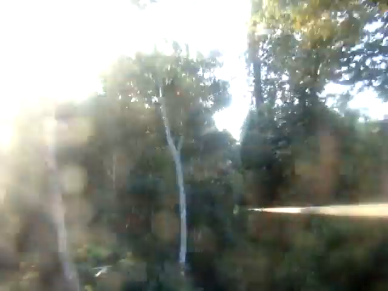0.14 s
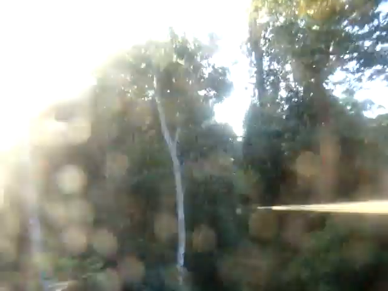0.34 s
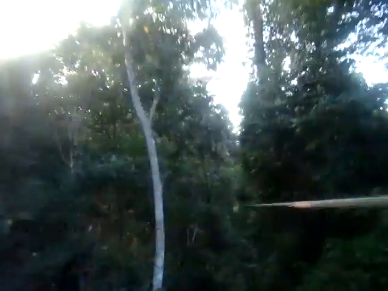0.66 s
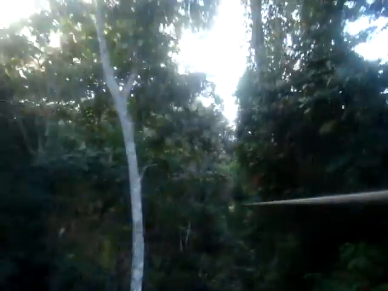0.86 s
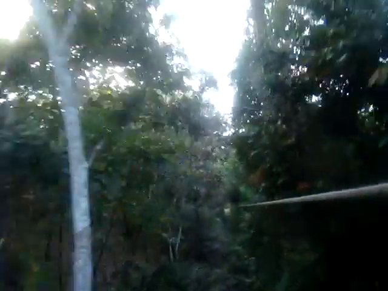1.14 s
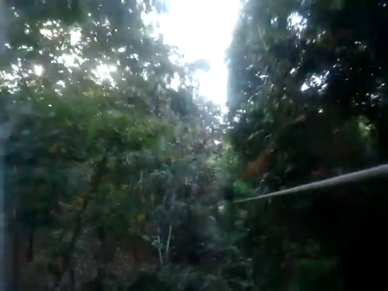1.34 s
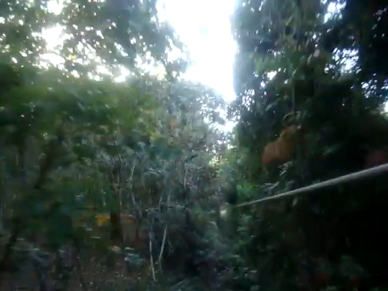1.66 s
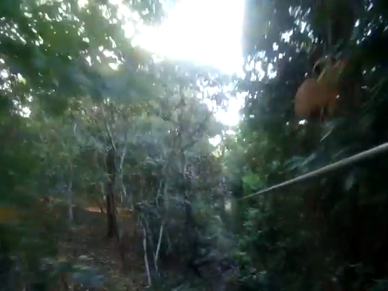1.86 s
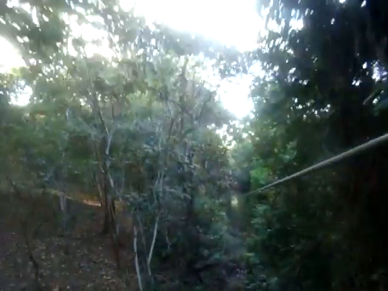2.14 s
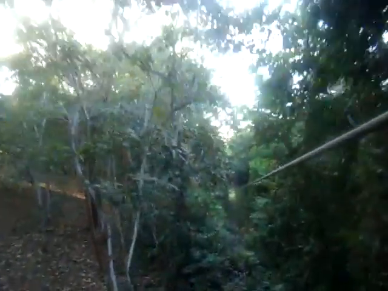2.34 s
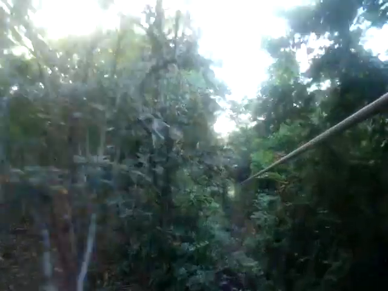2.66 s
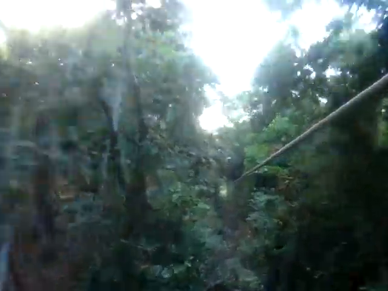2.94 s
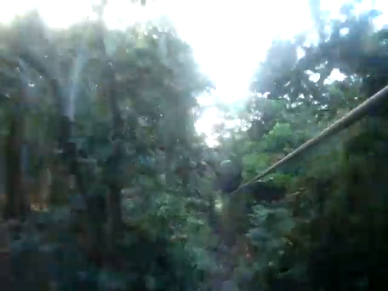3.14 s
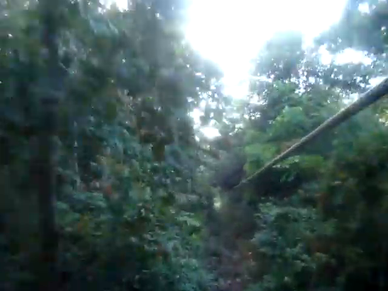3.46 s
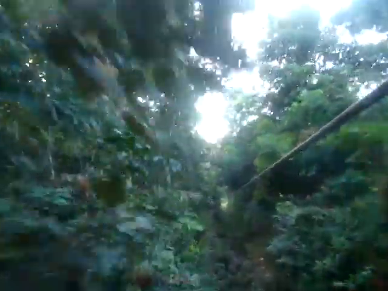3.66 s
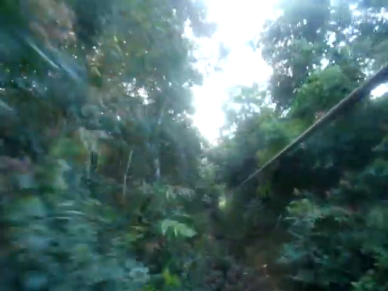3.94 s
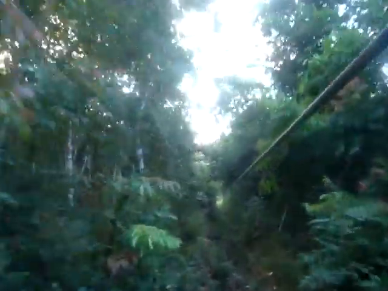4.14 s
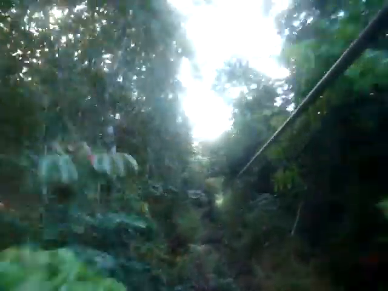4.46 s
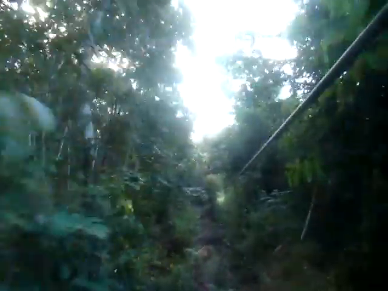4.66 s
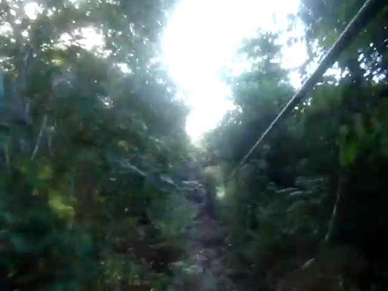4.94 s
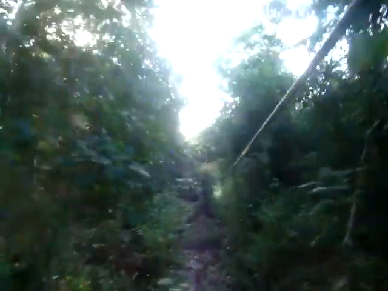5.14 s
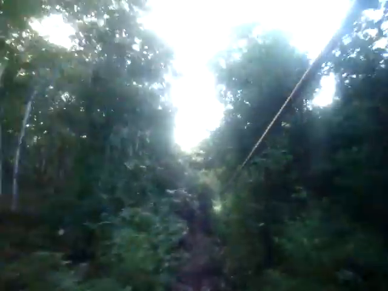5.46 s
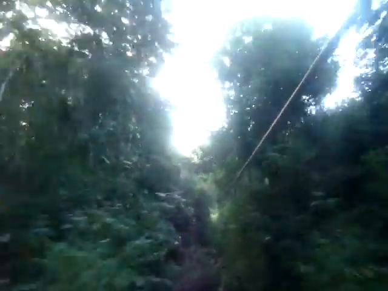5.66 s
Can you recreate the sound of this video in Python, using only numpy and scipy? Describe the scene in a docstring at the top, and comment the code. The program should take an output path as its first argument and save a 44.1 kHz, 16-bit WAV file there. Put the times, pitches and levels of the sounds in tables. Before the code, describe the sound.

A zip line trolley rolls along a steel cable through a forest, heard up close from the rider's position. Its pulleys give a buzzing whine that climbs steadily in pitch with a slight waver, over a broad metallic rasp. Thin, high ringing tones swell and fade with a few tiny squeals. A low rush of air sits underneath and grows stronger toward the end.

```python
"""Just below a stranded steel cable, a zip line trolley gathers speed.
Strands tick under its two pulleys: a periodic excitation, heard as a rising, gently swaying whine.
Rough rolling contact drives the resonances of the metal parts into a broad rasp.
Two lightly damped pulley modes sing in swells at fixed pitches,
and a low rush of air past the rider is strongest late in the ride."""
import sys
import numpy as np
from scipy import signal
from scipy.fft import rfft, irfft, next_fast_len
from scipy.io import wavfile
from scipy.ndimage import map_coordinates

SR = 44100
rng = np.random.default_rng(int(sys.argv[2]) if len(sys.argv) > 2 else 0)


def dump(signal):
    """Clip the signal to [-1, 1] and save it as 16-bit WAV at the path in sys.argv[1]."""
    limited = np.clip(np.atleast_2d(signal).T, -1, 1)
    pcm = np.round(limited * 32767).astype(np.int16)
    wavfile.write(sys.argv[1], SR, pcm)


N = 255339

# Resonances that shape the whine: centre_hz, nominal_width_hz, level_db
WHINE_RESONANCES = [(599, 370, -36), (1047, 338, -26.5), (1211, 125, -37.5), (1636, 374, -31),
                    (2005, 240, -35), (2210, 250, -27.5), (2600, 670, -28.5), (3020, 360, -34.5),
                    (3250, 480, -36), (3740, 460, -25.5), (4460, 790, -33.5)]
# Harmonics of the strand rate, relative to those resonances: multiple, slow_db, fast_db
WHINE_HARMONICS = [(1, 0, -0.5), (2, -0.5, -1.5), (3, 0, 2.5), (4, -3.5, -6), (5, -1, 2), (6, -10, -7),
                   (7, -4, -2.5)]
# Relative spectrum of steel rolling on steel: frequency_hz, slow_db, fast_db
CONTACT_SPECTRUM = [(520, -22, -38), (702, -6.5, -21.5), (1017, -2.5, -15), (1396, -11.5, -15),
                    (1870, -1.5, -13), (2290, -5.5, -9.5), (3430, -4.5, -1), (4200, 2, -6.5),
                    (5040, 1.5, -4.5), (6520, 1.5, -6), (8840, -5, -5), (9250, -11, -11.5),
                    (10600, -9, -8.5)]
# Resonances of pulleys and side plates: centre_hz, width_hz, slow_lift_db, fast_lift_db
METAL_MODES = [(814, 175, -5.5, 9), (1687, 59, 12.5, 8), (1998, 150, 3.5, 15), (2454, 10.4, 19, 17.5),
               (2610, 87, 13, 14), (2926, 145, 1, 6), (3203, 32, 18.5, 6.5), (3675, 86, 13.5, 12),
               (3780, 92, 11.5, -12), (4640, 83, 10, 15.5), (4850, 90, 12.5, 9), (5490, 70, 10.5, 10.5),
               (5670, 28, 10, 4.5), (6080, 147, 8.5, 6.5), (6750, 55, 9.5, 0), (6960, 31, 2, 1),
               (7140, 85, 3, 12.5), (7314, 83, 14.5, -4), (7670, 78, -15, 8), (8010, 90, 8, 8.5),
               (8570, 120, 2.5, -3), (9010, 48, 11.5, 5), (9150, 44, 9, 13)]
# Relative level of the grinding side plates: time_s, level_db
GRIND_ENVELOPE = [(0, -17.5), (1.1, -18.5), (1.85, -18), (2.5, -21.5), (3.8, -22), (4.4, -24),
                  (5.79, -23.5)]
# Relative level of the treble near 8.5 kHz: time_s, level_db
SIZZLE_ENVELOPE = [(0, -28.5), (.5, -30), (1.3, -27.5), (1.43, -29), (1.85, -22), (2.4, -24), (3.55, -26.5),
                   (4.4, -26.5), (5.79, -25)]
# Lag of a reflection off nearby gear, shrinking as the rider swings under the cable: time_s, lag_ms
REFLECTION_LAG = [(0, .36), (1.1, .345), (1.5, .31), (1.8, .278), (2.3, .252), (2.6, .24), (3, .205),
                  (4, .171), (5.79, .145)]
# Level of the upper singing mode, strongest in mid-ride: time_s, level_db
HIGH_RING_ENVELOPE = [(0, -32.5), (1.2, -31), (2.6, -23.5), (3.85, -24.5), (4.15, -29), (5.79, -27)]
# Brief squeals of the singing modes: peak_s, mode_hz, lift_db, half_length_s
SQUEAL_PEAKS = [(.25, 3221, 9, .02), (.42, 3221, 7, .02), (.49, 3221, 7, .025), (.9, 3221, 5, 0.066),
                (2.595, 4866, 9.5, 0.016), (3.977, 4866, 7, .018), (5.018, 4866, 7.5, .018)]
# Relative level of the air past the rider: time_s, level_db
AIR_ENVELOPE = [(0, -48.5), (.5, -48), (1.6, -50), (2.5, -51), (3.3, -49), (4.3, -47), (4.9, -42.5),
                (5.4, -43), (5.79, -44.5)]
# Relative spectrum of that air: frequency_hz, level_db
AIR_SPECTRUM = [(20, -36), (50, -28), (90, -13.5), (135, -7), (220, -1.5), (350, 2.5), (520, 0.5),
                (750, -0.5), (1300, -28), (3000, -62)]

START_HZ, TERMINAL_HZ = 487.7, 840  # strand rate at the outset, and where drag would balance gravity
TIME_S = np.arange(N) / SR


def strand_rate(run_up_s=8, sway_hz=3.5, sway_decay_s=7, sway_strands=154, crest_strand=89, drift_hz=1.8):
    """Approach to terminal speed: strands pass ever faster, with a sway periodic in distance."""
    run_up_hz = TERMINAL_HZ - (TERMINAL_HZ - START_HZ) * np.exp(-TIME_S / run_up_s)
    passed = np.cumsum(run_up_hz) / SR
    sway = np.exp(-TIME_S / sway_decay_s) * np.cos(2 * np.pi * (passed - crest_strand) / sway_strands)
    return run_up_hz + sway_hz * sway + drift_hz * wobble(22)


def strand_whine(strand_hz, phase, shake):
    """Forced vibration: strand harmonics swell and fade as they climb through fixed resonances."""
    fast = pace(strand_hz)
    grid_hz = np.linspace(0, SR / 4, 4096)
    body = np.sqrt(sum(amp(db) ** 2 * resonance(grid_hz, centre, width) ** 4
                       for centre, width, db in WHINE_RESONANCES))
    whine = np.zeros(N)
    for k, slow_db, fast_db in WHINE_HARMONICS:
        flutter_db = (0.37 * (k - 1) - 0.4) * wobble(35)  # the top harmonics feel cable wear most
        level_db = slow_db + (fast_db - slow_db) * fast + flutter_db - 0.4 * shake
        rms = np.interp(k * strand_hz, grid_hz, body) * amp(level_db)
        whine += rms * np.sqrt(2) * np.sin(k * phase + rng.uniform(0, 2 * np.pi))
    return whine


def rolling_rasp(strand_hz, phase, shake, strand_depth=0.14):
    """Roughness excitation: steel on steel makes noise, modulated by shaking and by each strand's load."""
    fast = pace(strand_hz)
    grid_hz = np.linspace(0, SR / 2, 8192)
    slow_gain, fast_gain = metal_response(grid_hz, 0), metal_response(grid_hz, 1)

    def register(low_hz, high_hz, order=20):
        """One band of rasp: its colour follows speed, its level the patches of wear on the cable."""
        passband = band(grid_hz, low_hz, high_hz, order)
        wear = amp(0.28 * wobble(21.99))
        slow_noise = noise(lambda hz: np.interp(hz, grid_hz, slow_gain * passband))
        fast_noise = noise(lambda hz: np.interp(hz, grid_hz, fast_gain * passband))
        return wear * (np.sqrt(1 - fast) * slow_noise + np.sqrt(fast) * fast_noise)

    plates = amp(envelope(GRIND_ENVELOPE) - 0.96 + 0.83 * shake) * register(480, 4250)
    wheels = amp(-19 - 0.97 * fast + 0.49 * shake) * register(4180, 7800)
    # The wire's fine roughness sizzles; a topmost fizz grows at high speed.
    sizzle = amp(envelope(SIZZLE_ENVELOPE) - 0.5 + 0.49 * shake) * register(8020, 9470, order=30)
    fizz = amp(-41 + 7 * pace(strand_hz, slow_hz=596, fast_hz=640)) * register(9500, 10300, order=30)
    return (plates + wheels + sizzle + fizz) * (1 + strand_depth * np.cos(phase))


def metal_response(hz, fast):
    """Modal filtering: resonances add in power to lift the contact spectrum, slow (0) or fast (1)."""
    lift = sum(amp(lifts_db[fast]) ** 2 * resonance(hz, centre, width)
               for centre, width, *lifts_db in METAL_MODES)
    return spectrum_gain(CONTACT_SPECTRUM, hz, column=1 + fast) * np.sqrt(1 + lift)


def with_reflection(direct, strength=0.19):
    """Interference: a close reflection cuts comb notches, which rise as its path shortens."""
    lag_samples = envelope(REFLECTION_LAG) * SR / 1000
    return direct + strength * map_coordinates(direct, [np.arange(N) - lag_samples])


def singing_pulleys(strand_hz, low_hz=3221, high_hz=4866, fade_db_per_hz=0.08):
    """Natural modes: the pulleys ring like bells, in random swells, at pitches independent of speed."""
    low_db = -25.5 - fade_db_per_hz * (strand_hz - START_HZ) + 3 * wobble(18)
    high_db = envelope(HIGH_RING_ENVELOPE) + 2 * wobble(45)
    low = amp(low_db + squeal_lift_db(low_hz)) * rubbed_mode(low_hz, steadiness=0.5)
    high = amp(high_db + squeal_lift_db(high_hz)) * rubbed_mode(high_hz, steadiness=0.67)
    return low + high


def rubbed_mode(centre_hz, steadiness, width_hz=26):
    """Friction excitation: a lightly damped mode under constant rubbing gives a narrow, restless tone."""
    narrowband = noise(lambda hz: resonance(hz, centre_hz, width_hz))
    analytic = signal.hilbert(narrowband, next_fast_len(N))[:N]
    return unit_rms(analytic.real / (np.abs(analytic) + 0.11) ** steadiness)  # partly evens the level


def squeal_lift_db(mode_hz):
    """Amplitude modulation: brief Gaussian rises in one mode's level are heard as squeals."""
    return sum(lift_db * np.exp(-((TIME_S - peak_s) / half_length_s) ** 2)
               for peak_s, hz, lift_db, half_length_s in SQUEAL_PEAKS if hz == mode_hz)


def rushing_air(gust_db=0.97, lump_db=4):
    """Turbulence: air streaming past the rider makes a low, gusty rush and faint lumps of buffeting."""
    rush_db = envelope(AIR_ENVELOPE) + 4 + gust_db * wobble(12)
    rush = amp(rush_db) * noise(lambda hz: spectrum_gain(AIR_SPECTRUM, hz))
    buffet = amp(-81 + lump_db * wobble(9)) * noise(lambda hz: band(hz, 20, 75, order=2))
    return rush + buffet


def pace(strand_hz, slow_hz=552, fast_hz=596):
    """Linear crossfade: 0 while the trolley is slow, 1 once it runs fast."""
    return np.clip((strand_hz - slow_hz) / (fast_hz - slow_hz), 0, 1)


def resonance(hz, centre_hz, width_hz):
    """Lorentzian peak of height 1, width_hz wide at half height."""
    return 1 / (1 + (2 * (hz - centre_hz) / width_hz) ** 2)


def band(hz, low_hz, high_hz, order):
    """Butterworth-shaped band-pass gain."""
    return 1 / np.sqrt((1 + (low_hz / (hz + 1)) ** (2 * order)) * (1 + (hz / high_hz) ** (2 * order)))


def amp(db):
    """Decibels to amplitude ratio."""
    return 10 ** (np.asarray(db) / 20)


def unit_rms(x):
    """Normalisation to rms 1."""
    return x / np.sqrt(np.mean(np.abs(x) ** 2) + 1e-20)


def spectrum_gain(table, hz, column=1):
    """Gain from a decibel column, interpolated on a log-frequency axis."""
    columns = np.transpose(table)
    return amp(np.interp(np.log(hz + 1), np.log(columns[0] + 1), columns[column]))


def envelope(table):
    """Linear interpolation of a time table at every sample."""
    return np.interp(TIME_S, *np.transpose(table))


def wobble(rate_hz):
    """Smooth random modulation: a spline through rate_hz knots a second."""
    knots = rng.standard_normal(int(N * rate_hz / SR) + 4)
    return map_coordinates(knots, [TIME_S * rate_hz])


def filtered(x, response):
    """Linear filtering: the spectrum of x times response(hz)."""
    size = next_fast_len(N + SR // 4)
    return irfft(rfft(x, size) * response(np.fft.rfftfreq(size, 1 / SR)), size)[:N]


def noise(response):
    """White noise coloured by response(hz), at rms 1."""
    return unit_rms(filtered(rng.standard_normal(N), response))


def scene(lay_jitter=0.0033):
    """Superposition of four sources; the cable's uneven lay jitters the phase of whine and rasp."""
    strand_hz = strand_rate()
    phase = 2 * np.pi * np.cumsum(strand_hz * (1 + lay_jitter * wobble(60))) / SR
    shake = wobble(40)  # the trolley's shaking, shared by whine and rasp
    whine = strand_whine(strand_hz, phase, shake)
    rasp = with_reflection(rolling_rasp(strand_hz, phase, shake))
    return (whine + rasp + singing_pulleys(strand_hz) + rushing_air())[None]


def record(dry, cutoff_hz=10080, edge_hz=120):
    """Band limiting: a steep low-pass removes the highest treble."""
    return np.array([filtered(x, lambda hz: np.clip((cutoff_hz - hz) / edge_hz + .5, 0, 1)) for x in dry])


dry = scene()
out = record(dry)
dump(out)
```